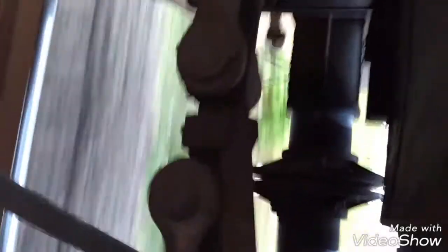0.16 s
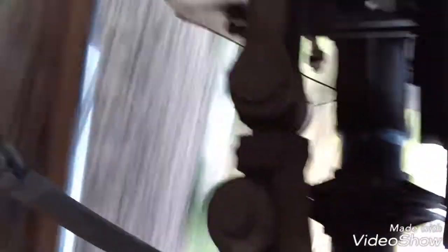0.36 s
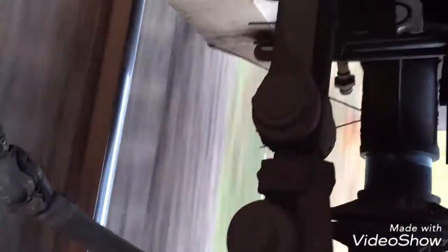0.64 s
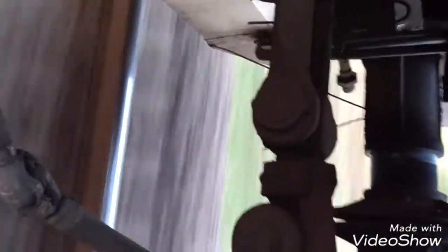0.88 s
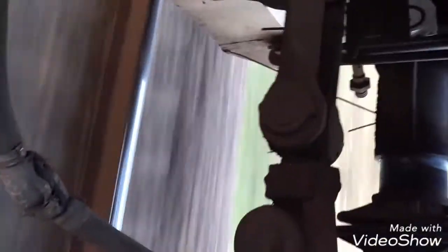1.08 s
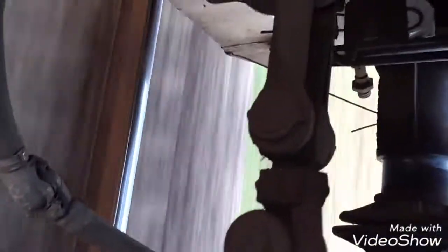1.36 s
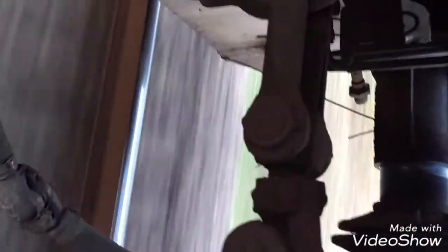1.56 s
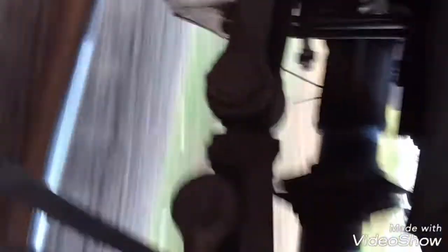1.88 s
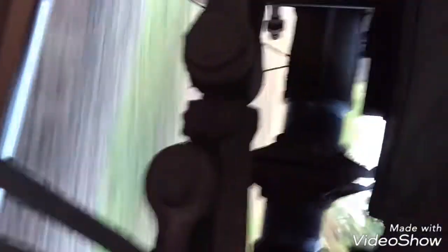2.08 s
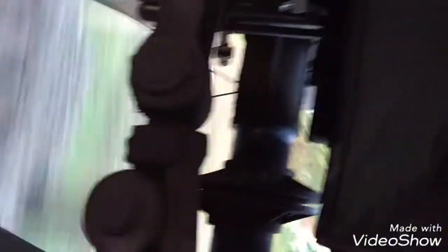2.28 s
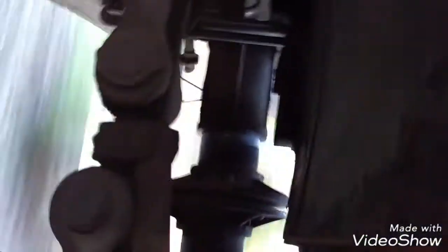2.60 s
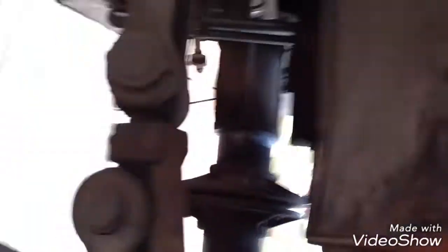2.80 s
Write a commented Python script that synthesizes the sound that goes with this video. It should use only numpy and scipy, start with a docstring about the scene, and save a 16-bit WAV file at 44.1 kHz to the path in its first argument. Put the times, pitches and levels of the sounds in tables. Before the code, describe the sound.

A fast train's wheels roar on the rails for the whole three seconds, heard close above the coupling between coaches. About twelve jolts a second rattle the coupling and make the coach end boom, over low rumble and air hissing through the gap. Brief steel rasps come between 0.2 and 1.3 seconds, then near 2.3 and 2.9. The roar stays loud with small surges, its peaks slightly distorted.

```python
"""Wheels roar on the rails, heard from between two coaches of a fast train, right above the coupling.
About twelve times a second, once per wheel turn, a jolt rattles the coupling and the coach end booms.
Steel rasps on steel, the running gear rumbles underneath and air hisses through the gap.
The two-port stereo microphone is close enough to be driven into clipping on the loudest peaks."""
import sys
import numpy as np
from scipy import signal
from scipy.fft import rfft, irfft
from scipy.io import wavfile
from scipy.ndimage import uniform_filter1d

SR = 44100
rng = np.random.default_rng(int(sys.argv[2]) if len(sys.argv) > 2 else 0)


def to_wav(sig):
    """Store sig (one row per channel, or 1-D mono) as 16-bit WAV at the path in sys.argv[1].

    Samples outside -1..1 are clipped; the rate is SR.
    """
    pcm = np.clip(np.atleast_2d(sig), -1, 1) * 32767
    pcm = np.round(pcm).astype(np.int16)
    wavfile.write(sys.argv[1], SR, pcm.T)  # frames by channels


N = 129654

# Tone of the wheel roar, gear rumble, air rush and air hiss at the microphone.
# Each row: frequency in Hz, relative density in dB at the left port, the same at the right.
ROAR_SPECTRUM = [(593, -16.5, -23), (970, -11.5, -13), (1220, -10.5, -9.5), (1324, -5.5, -7),
                 (1570, -8.5, -6), (2060, -2.5, 1), (2560, 3.5, 2.5), (3150, -2, 0), (4130, -1, -11),
                 (6000, -21, -46)]
RUMBLE_SPECTRUM = [(25, -24, -24), (55, -3, -26), (95, -6, -4), (125, 3.5, -9), (175, 1, 2),
                   (245, -1.5, -10), (410, 2, -4), (705, 2, 1), (1050, -2, -11), (1470, -11.5, -25),
                   (2500, -3, -32)]
RUSH_SPECTRUM = [(2150, -45, -22), (3150, 0.5, -10), (4140, -3, 3), (4500, -1.5, -8.5), (5050, -2, -5.5),
                 (5870, 0.5, -4), (7600, -3, -15), (8460, -15.5, -12.5), (12100, -20, -44)]
HISS_SPECTRUM = [(4500, -2, -26), (7000, -8.5, 2), (8000, 2.5, -17), (10600, 3, -14.5), (11900, -0.5, -22),
                 (13100, 2, -33), (14800, -4.5, -34), (15500, -13, -42)]
# How those four surge and dip. Each row: time in seconds, relative level in dB.
ROAR_SURGES = [(0.0, -22.5), (0.02, -14.5), (0.05, -20), (0.06, -15), (0.22, -14.5), (0.24, -22),
               (0.29, -11), (0.3, -19), (0.39, -12), (0.43, -17), (0.46, -11.5), (0.47, -18), (0.52, -13.5),
               (0.54, -21), (0.56, -14), (0.59, -15.5), (0.71, -17.5), (0.76, -19), (0.8, -13),
               (0.81, -14.5), (0.92, -22), (0.96, -14.5), (1.0, -15), (1.01, -19), (1.03, -21), (1.04, -15),
               (1.1, -15.5), (1.15, -19.5), (1.19, -23), (1.21, -15), (1.24, -14), (1.28, -18), (1.29, -16),
               (1.47, -15.5), (1.49, -18.5), (1.57, -13.5), (1.61, -17.5), (1.65, -14.5), (1.67, -22),
               (1.73, -15.5), (1.87, -15), (1.91, -16.5), (1.92, -26), (1.94, -16), (2.0, -15), (2.23, -15),
               (2.33, -15), (2.64, -16.5), (2.65, -15.5), (2.8, -16), (2.82, -22), (2.94, -14.5)]
RUMBLE_SURGES = [(0, -2), (.75, 0), (.92, -2.5), (1.15, -2.5), (1.3, -1.5), (1.63, 1.5), (1.69, -5),
                 (1.74, -2), (1.88, -1.5), (1.93, -7.5), (2.02, 2), (2.7, -1), (2.79, -1), (2.825, -9),
                 (2.87, -6), (2.94, -5)]
RUSH_SURGES = [(0, -20.5), (.03, -15), (.21, -17), (.24, -17.5), (.28, -15.5), (.55, -17.5), (.62, -13),
               (.88, -17), (.92, -21), (.96, -18), (1.16, -17), (1.25, -15), (1.63, -15.5), (1.69, -22),
               (1.73, -15.5), (2.2, -15), (2.4, -13.5), (2.6, -14.5), (2.82, -13.5), (2.94, -17.5)]
HISS_SURGES = [(0, -17.5), (.04, -19), (.1, -14), (.2, -24), (.23, -16.5), (.3, -17.5), (.39, -21),
               (.48, -16), (.505, -22), (.535, -16), (.64, -22), (.73, -18.5), (.79, -21), (.92, -16),
               (.96, -21.5), (1.02, -18), (1.08, -20), (1.14, -14), (1.26, -20), (1.6, -19.5), (1.68, -16),
               (1.73, -20), (1.9, -18), (1.92, -17.5), (1.96, -22), (2.3, -19), (2.45, -22), (2.58, -18.5),
               (2.72, -21.5), (2.85, -16.5), (2.9, -16), (2.94, -17)]
# One jolt per wheel turn. Each row: start in seconds, rattle level in dB, rattle centre in Hz,
# delay to the boom's peak in seconds, boom level in dB, thud level in dB. Levels are relative.
WHEEL_JOLTS = [(0.024, -25, 690.0, 0.017, -27, -30.5), (0.118, -26.5, 430.0, 0.0079, -26, -32.0),
               (0.197, -23.5, 514, 0.01, -23, -33.5), (0.285, -25.5, 480.0, 0.0094, -25, -31),
               (0.374, -23.5, 620.0, 0.019, -22, -30), (0.451, -37, 450.0, 0.016, -36, -43),
               (0.522, -29.5, 613, 0.017, -26.5, -33.0), (0.596, -20.5, 700.0, 0.017, -46, -37.0),
               (0.69, -31.5, 410.0, 0.0127, -27.5, -40), (0.772, -27, 560.0, 0.0125, -33.5, -36),
               (0.86, -34, 610.0, 0.012, -53, -40), (0.952, -22, 707, 0.015, -46, -45),
               (1.034, -21.5, 690, 0.026, -46, -50), (1.121, -23.5, 590, 0.02, -33.0, -53),
               (1.212, -26, 610, 0.015, -34, -42), (1.294, -26.5, 560, 0.024, -33.5, -55.0),
               (1.38, -20, 636, 0.022, -32, -30), (1.473, -30, 690.0, 0.019, -27, -42),
               (1.56, -27, 680.0, 0.011, -32.0, -40), (1.64, -39, 380.0, 0.011, -30, -41),
               (1.732, -31.5, 530.0, 0.015, -27, -39), (1.826, -34, 610.0, 0.015, -32, -40),
               (1.909, -38, 460.0, 0.029, -52.0, -52), (1.999, -23.5, 630, 0.0087, -30.5, -38.5),
               (2.077, -30, 687, 0.0082, -26, -31), (2.164, -22.5, 570.0, 0.013, -23.0, -33),
               (2.25, -24.5, 550.0, 0.016, -21.0, -29.5), (2.335, -23.0, 580, 0.015, -38.0, -48),
               (2.434, -21.5, 650, 0.0034, -27, -47), (2.505, -23, 486, 0.014, -21.5, -41),
               (2.594, -31.5, 350.0, 0.018, -25, -29.5), (2.661, -21.5, 646, 0.016, -30, -35.5),
               (2.757, -23, 686, 0.016, -39, -41), (2.858, -24.5, 510.0, 0.014, -52, -37)]
# Resonances of the coupling. Each row: frequency in Hz, width in Hz, relative level in dB.
COUPLING_MODES = [(258, 35, 0.5), (323, 63, 0.5), (429, 110, -1.5), (567.6, 34, -2), (703, 88, -2.5),
                  (796, 35, -4), (1300, 250, 10)]
# Steel rubbing on steel. Each row: start and length in seconds, first and last pitch in Hz, level in dB.
STEEL_RASPS = [(0.218, .06, 8100, 7900, -15), (0.357, .06, 2150, 2325, -11), (.62, 0.056, 3000, 2900, -14),
               (0.681, .06, 2300, 2630, -13), (.77, 0.043, 2150, 2130, -11),
               (1.066, 0.05, 2600, 2820, -13.5), (1.213, .05, 2300, 2210, -16),
               (2.30, 0.049, 1800, 2110, -10.5), (2.408, 0.058, 7900, 7800, -18),
               (2.861, 0.058, 13000, 12900, -23)]

# Lag of the right port behind the left; jolts and rumble come from nearly straight ahead.
SIDE_LAG_S, AHEAD_LAG_S = 0.00043, 0.00021


def rolling():
    """Wheels roar on the rails in surges, over the rumble of the running gear."""
    rumble = turbulence(RUMBLE_SPECTRUM, shared=0.59, flicker_db=1.5, flicker_hz=35, lag_s=AHEAD_LAG_S)
    roar = turbulence(ROAR_SPECTRUM, shared=0.21, flicker_db=1.37, flicker_hz=30)
    return undb(4) * curve(ROAR_SURGES) * roar + undb(-25) * curve(RUMBLE_SURGES) * rumble


def jolts():
    """The coupling rattles and the coach end knocks and booms, a little to the left; its thud is central."""
    boom_db, thud_db = np.array(WHEEL_JOLTS).T[-2:]
    knock = panel_mode(boom_db - 4, hz=263.6, rise_s=0.009, decay_s=0.013, scatter=0.12)
    boom = panel_mode(boom_db + 2.5, hz=174.7, rise_s=0.015, decay_s=0.014, scatter=0.039)
    thud = panel_mode(thud_db + 2.5, hz=98.7, rise_s=0.015, decay_s=0.033, scatter=0.08)
    pan = undb([[2], [-2]])
    left, right = (coupling_rattle() + knock + boom) * pan + thud
    samples = np.arange(N)
    return np.array([left, np.interp(samples - AHEAD_LAG_S * SR, samples, right)])


def coupling_rattle(clicks_per_s=1100, attack_s=0.0045, hold_s=0.024, decay_s=0.016, spread_octaves=0.45):
    """Each jolt sets off a burst of small collisions that ring the coupling just below the microphone."""
    start, db, centre = np.array(WHEEL_JOLTS).T[:3]
    hz, width, mode_db = np.array(COUPLING_MODES).T
    clicks = (rng.random((3, N)) < clicks_per_s / SR) * rng.standard_normal((3, N))
    blows = unit(clicks[2] + 0.45 * clicks[:2])  # common to both ports, plus weaker ones at each
    age = np.maximum(np.arange(N) / SR - start[:, None], 0)
    bursts = np.minimum(age / attack_s, 1) * np.exp(-np.maximum(age - hold_s, 0) / decay_s)
    # Each jolt shares its power among the modes, favouring those near its centre.
    share = undb(mode_db) * np.exp(-0.5 * (np.log2(hz / centre[:, None]) / spread_octaves) ** 2)
    share /= np.sqrt((share ** 2 * width * np.pi / SR).sum(axis=1, keepdims=True))
    drive = (share * undb(db + 3)[:, None]).T @ bursts
    ring = sum(resonate(blows * push, f, w) for push, f, w in zip(drive, hz, width))
    return signal.sosfilt(signal.butter(2, [170, 1600], "band", fs=SR, output="sos"), ring)


def panel_mode(levels_db, hz, rise_s, decay_s, scatter):
    """A heavily damped mode of the coach end swells after every jolt, at a slightly different pitch."""
    t, out = np.arange(N) / SR, 0
    draws = rng.standard_normal((len(WHEEL_JOLTS), 2))
    for (start, _, _, delay, _, _), db, (detune, phase) in zip(WHEEL_JOLTS, levels_db, draws):
        age = t - start - delay
        swell = np.exp(-(np.minimum(age, 0) / rise_s) ** 2 - np.maximum(age, 0) / decay_s)
        cycles = hz * (1 + scatter * detune) * age + phase
        out += undb(db) * swell * np.exp(2j * np.pi * cycles)
    roughness = 0.84 * (wander(110) + 1j * wander(110))  # shakes both level and phase
    return np.real(out * (np.sqrt(2) + roughness))


def rasps(width_hz=350):
    """Rubbing steel rings briefly: narrow bands of noise that glide within the roar."""
    t, out = np.arange(N) / SR, 0
    lowpass = signal.butter(2, width_hz / 2, fs=SR, output="sos")
    grit = unit(signal.sosfilt(lowpass, rng.standard_normal((2, 2, N))))
    for start, length, first_hz, last_hz, db in STEEL_RASPS:
        progress = np.clip((t - start) / length, 0, 1)
        phase = 2 * np.pi * np.cumsum(first_hz + (last_hz - first_hz) * progress) / SR
        ring = grit[0] * np.cos(phase) + grit[1] * np.sin(phase)
        out += undb(db) * np.sin(np.pi * progress) * ring
    return out


def wind():
    """Air rushes through the gap between the coaches and hisses mostly past the left port."""
    rush = turbulence(RUSH_SPECTRUM, shared=0.12, flicker_db=2.7, flicker_hz=33)
    hiss = turbulence(HISS_SPECTRUM, shared=0.095, flicker_db=2.22, flicker_hz=45)
    return undb(2.5) * curve(RUSH_SURGES) * rush + undb(5) * curve(HISS_SURGES) * hiss


def turbulence(spectrum, shared, flicker_db, flicker_hz, lag_s=SIDE_LAG_S):
    """Stereo noise in half-octave bands, each flickering on its own; both ports pick up a shared part."""
    hz, left, right = np.array(spectrum).T
    f = np.maximum(np.fft.rfftfreq(N, 1 / SR), 1)
    colour = undb([np.interp(np.log(f), np.log(hz), db) for db in (left, right)])
    skirts = np.minimum(f / hz[0], 1) ** 2 * np.minimum(hz[-1] / f, 1) ** 2
    noise = rfft(rng.standard_normal((3, N)))
    common = noise[2] * np.array([np.ones_like(f), np.exp(-2j * np.pi * f * lag_s)])
    at_ports = colour * skirts * (np.sqrt(shared) * common + np.sqrt(1 - shared) * noise[:2])
    out = 0
    for band in range(8, 29):  # centres from 16 Hz to 16 kHz
        window = np.maximum(1 - abs(2 * np.log2(f) - band), 0)
        out += irfft(at_ports * window, N) * undb(flicker_db * wander(flicker_hz))
    return unit(out)


def resonate(x, hz, width):
    """One resonance, gain 1 at its centre."""
    return signal.lfilter(*signal.iirpeak(hz, hz / width, fs=SR), x)


def wander(rate_hz):
    """Random steps at the given rate, smoothed twice, at rms 1."""
    hold = max(int(SR / rate_hz), 2)
    steps = rng.standard_normal(N)[np.arange(N) // hold]
    return unit(uniform_filter1d(uniform_filter1d(steps, hold), hold))


def curve(rows):
    """Gain along points of time in seconds and level in dB."""
    return undb(np.interp(np.arange(N) / SR, *np.array(rows).T))


def undb(db):
    """Decibels to gain."""
    return 10 ** (np.asarray(db) / 20)


def unit(x):
    """Scale to rms 1."""
    return x / np.sqrt(np.mean(x ** 2) + 1e-18)


def scene():
    """Everything that reaches the microphone above the coupling."""
    return jolts() + rasps() + rolling() + wind()


def record(dry, ceiling=0.89, top_hz=15600):
    """The close microphone clips on the loudest peaks, then the top treble is cut steeply."""
    lowpass = signal.ellip(10, 0.1, 70, top_hz, fs=SR, output="sos")
    return signal.sosfilt(lowpass, np.clip(dry, -ceiling, ceiling))


dry = scene()
out = record(dry)
to_wav(out)
```